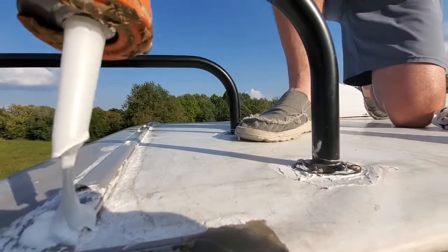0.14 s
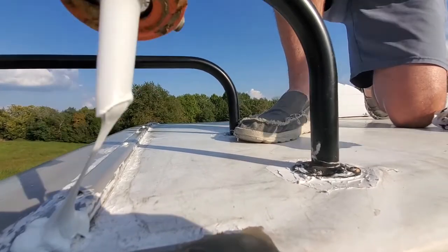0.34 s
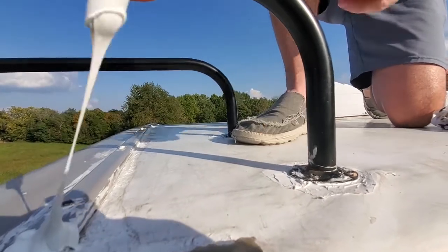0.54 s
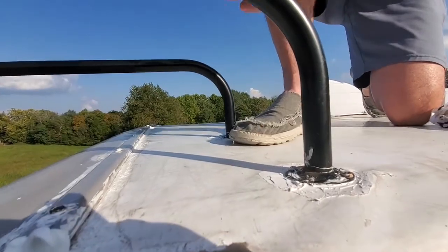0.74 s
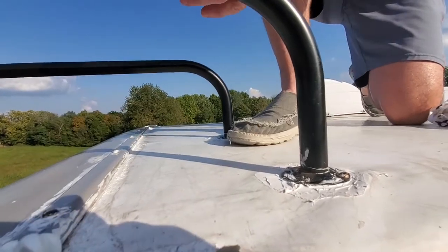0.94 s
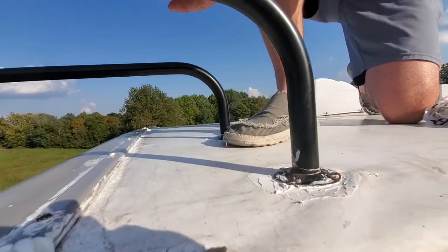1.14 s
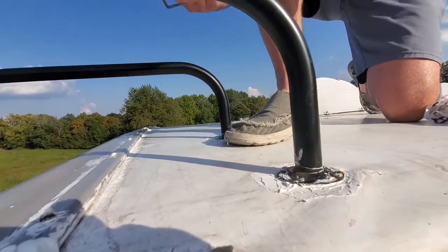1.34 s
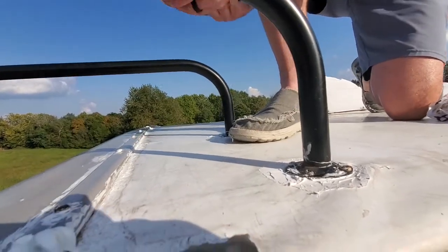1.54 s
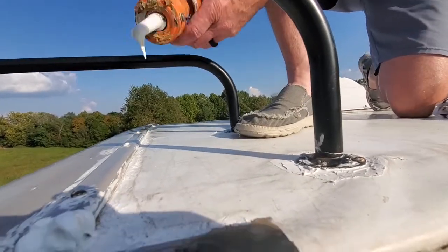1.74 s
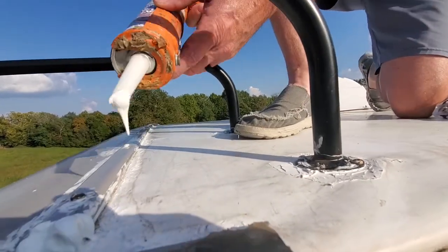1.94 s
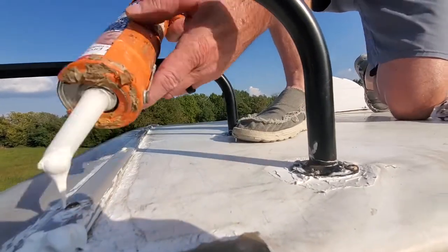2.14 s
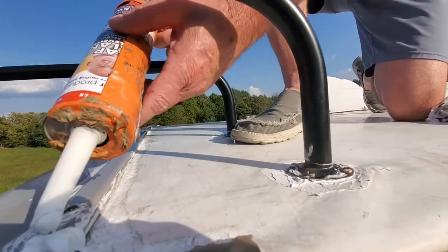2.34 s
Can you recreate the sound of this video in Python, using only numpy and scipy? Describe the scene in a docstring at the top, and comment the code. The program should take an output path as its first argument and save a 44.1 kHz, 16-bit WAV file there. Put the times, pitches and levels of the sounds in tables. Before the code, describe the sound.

A caulking gun handled close up on a vehicle roof outdoors: two bright steel snaps at 0.21 and 0.32 seconds, the first louder with a short panel boom. Grainy rustles follow, strongest around 1.0, with small ticks and dull hollow knocks at 1.23, 1.37 and, softer, 1.94. A faint rough squeak falls near 2.2. Throughout, quiet wavering engine hum, light breeze, and thin high insect trill.

```python
"""Outdoors, a distant engine hums while an insect trills over a high chorus in the grass: wavering sines and noise.
Close to the microphone, a caulking gun is lifted from a seam on a vehicle's roof. Its steel catch snaps twice,
as noise bursts that ring the modes of the frame, and the roof panel booms softly in modes of its own.
The gun is shifted in the hand with rustles of grainy noise, small ticks and three dull knocks of its tube,
then lowered again with a faint, rough squeak."""
import sys
import numpy as np
from scipy import signal
from scipy.fft import rfft, irfft, next_fast_len
from scipy.io import wavfile
from scipy.ndimage import map_coordinates

SR = 44100
rng = np.random.default_rng(int(sys.argv[2]) if len(sys.argv) > 2 else 0)


def materialize(psi):
    """Save the field psi as 16-bit PCM at rate SR to the path in sys.argv[1].

    A 1-D psi becomes a single channel; in a 2-D psi each row is a channel.
    """
    bounded = np.clip(np.atleast_2d(psi).T, -1, 1)
    quanta = np.round(bounded * 32767).astype(np.int16)
    wavfile.write(sys.argv[1], SR, quanta)


N = 105840
T = np.arange(N) / SR

# modes of the gun's frame: (frequency [Hz], relative level [dB], 60 dB decay time [s])
FRAME_MODES = [(760, -8.5, 0.095), (951, -17, 0.1), (1126, -3, 0.046), (1411, -8, 0.067),
               (1682, -10, 0.057), (2040, -3, 0.056), (2300, -3, 0.017), (2414, -3.5, 0.035),
               (2900, -14, 0.076), (3160, -6, 0.036), (4157, -1, 0.055), (5960, -27, 0.019),
               (8840, -15.5, 0.11), (10800, -20, 0.06)]
# modes of the roof panel: (frequency [Hz], relative level [dB], 60 dB decay time [s])
ROOF_MODES = [(157.3, -1, 0.13), (236.5, 4, 0.12), (274.4, -6, 0.14), (474, -14.5, 0.22)]
# likeness of the left and right channels: (frequency [Hz], correlation [-1 to 1])
LIKENESS = [(40, 1), (80, 0.97), (140, 1), (270, 0.97), (640, 0.24), (1500, 0), (15000, 0.02)]
BOOM_ATTACK_S = 0.00067


def amp(db):
    """Decibels to gain."""
    return 10 ** (np.asarray(db) / 20)


def unit(x):
    """Scale to rms 1."""
    return x / np.sqrt(np.mean(x ** 2) + 1e-20)


def along(points, hz):
    """Read a curve of (Hz, value) points on a log frequency axis."""
    point_hz, value = np.transpose(points)
    return np.interp(np.log(hz + 1), np.log(point_hz + 1), value)


def pan(db):
    """Left and right gains for a level difference; positive leans left."""
    return amp(np.array([[.5], [-.5]]) * db)


def wobble(rate):
    """A smooth random curve through normal draws, rate of them a second."""
    knots = rng.standard_normal(int(N * rate / SR) + 4)
    return map_coordinates(knots, [T * rate])


def filtered(x, response):
    """Apply a gain that depends on frequency."""
    size = next_fast_len(N + SR // 4)
    spectrum = rfft(x, size) * response(np.fft.rfftfreq(size, 1 / SR))
    return irfft(spectrum, size)[..., :N]


def dull(hz, corner_hz):
    """Gain of a soft contact: flat, then falling 18 dB an octave above the corner."""
    return 1 / np.sqrt(1 + (hz / corner_hz) ** 6)


def thin(hz, corner_hz):
    """Gain of a light contact: weak below the corner."""
    return hz ** 2 / np.hypot(hz ** 2, corner_hz ** 2)


def ear_angle(hz):
    """Angle whose cosine is the left-right likeness."""
    return np.arccos(np.clip(along(LIKENESS, hz), -1, 1))


def noise(gain):
    """Stereo noise of rms 1, alike in the bass and unrelated in the treble."""
    def mid_side_gain(hz):
        turn = ear_angle(hz) / 2
        return gain(hz) * np.array([np.cos(turn), np.sin(turn)])

    mid, side = filtered(rng.standard_normal((2, N)), mid_side_gain)
    return unit(np.array([mid + side, mid - side]))


def tone(hz):
    """A sine of rms 1 on a pitch curve."""
    return np.sqrt(2) * np.sin(2 * np.pi * np.cumsum(hz) / SR)


def fade(start, t60, hold=0):
    """Begin at full level, hold, then die away by 60 dB in t60 seconds."""
    return (T >= start) * np.exp(-np.log(1000) * np.maximum(T - start - hold, 0) / t60)


def stroke(start, length):
    """Rise, hold and release of a hand movement; start is halfway up the rise."""
    rise_s, release_s = 0.036, 0.047  # full rise; time constant of the release
    rise = np.clip((T - start) / rise_s + .5, 0, 1)
    return rise * np.exp(-np.maximum(T - start - length, 0) / release_s)


def ring(modes, start, attack, contact=np.ones_like):
    """Decaying sines of struck modes; the higher ones reach the two ears out of step."""
    since = np.maximum(T - start, 0)
    out = np.zeros((2, N))
    for hz, db, t60 in modes:
        ear_shift = ear_angle(hz) * rng.choice([-1, 1]) * np.array([[.5], [-.5]])
        phase = rng.uniform(0, 2 * np.pi) + ear_shift
        gain = amp(db + rng.standard_normal((2, 1))) * contact(hz)  # about 1 dB of scatter at each ear
        out += gain * fade(start, t60) * np.sin(2 * np.pi * hz * since + phase)
    return out * (1 - np.exp(-since / attack))


def distance():
    """A far engine as two wavering sines, over low outdoor rumble and open air."""
    # rise and fall of the hum, relative to hum_db: (time [s], relative level [dB])
    hum_course = [(0, -54), (.45, -58.5), (.8, -55.5), (.98, -56.5), (1.15, -68), (1.55, -67), (1.85, -61),
                  (2.05, -55.5), (2.4, -64)]
    # distant rumble and open air: (frequency [Hz], relative level [dB per Hz])
    air_colour = [(20, -26), (33, -6.5), (48, 3), (90, 4.5), (160, -8), (260, -4), (350, -15), (480, -22.5),
                  (800, -24), (1400, -32.5), (5000, -36), (16000, -38)]
    hum_hz, hum_drift_hz, hum_db = 123.7, 0.9, -0.5
    upper_hz, upper_drift_hz, upper_db = 191.4, 6.7, -64.5
    air_db = -59.5
    hum_gain = amp(hum_db + np.interp(T, *np.transpose(hum_course)))
    hum = hum_gain * tone(hum_hz + hum_drift_hz * wobble(6.16))
    upper = amp(upper_db) * tone(upper_hz + upper_drift_hz * wobble(18))
    return hum + upper + amp(air_db) * noise(lambda hz: amp(along(air_colour, hz)))


def breeze():
    """Light air flutters separately on each microphone port, the gusts shared by both."""
    # flutter: (frequency [Hz], relative level [dB per Hz])
    flutter_colour = [(25, -18.5), (50, -3), (75, 0.5), (110, -5), (260, -8.5), (400, -24), (1000, -54)]
    breeze_db, gust_db = -66, 5.5
    flutter = unit(filtered(rng.standard_normal((2, N)), lambda hz: amp(along(flutter_colour, hz))))
    return amp(breeze_db + gust_db * wobble(5.07)) * flutter


def insects():
    """One trill, each wing stroke swelling and arching in pitch, over the hiss of many."""
    # chorus in the grass: (frequency [Hz], relative level [dB per Hz])
    chorus_colour = [(3000, -48.5), (6000, -12), (6700, -6), (7300, 7), (7900, 3.5), (8300, -1), (9100, -1),
                     (9900, -6), (11500, -7), (13000, -0.5), (15500, 0)]
    # lean of the chorus: (frequency [Hz], left-right difference [dB])
    chorus_lean = [(7000, 1), (9000, 4.8), (15000, 10)]
    strokes_per_s, swell_db, trill_db, chorus_db = 32, 9.5, -67.5, -57
    trill_hz, arch_hz, blur_hz = 7540, 306, 132
    wing = np.cos(2 * np.pi * np.cumsum(strokes_per_s + 0.37 * wobble(3)) / SR)
    pitch = trill_hz + arch_hz * wing + blur_hz * wobble(1500)
    trill = unit(amp(swell_db * wing) * tone(pitch))
    chorus = noise(lambda hz: amp(along(chorus_colour, hz)))
    chorus = filtered(chorus, lambda hz: pan(along(chorus_lean, hz)))
    return amp(trill_db) * trill + amp(chorus_db) * chorus


def rubbed(hz):
    """Gain of friction, coloured by the modes of the frame."""
    # rubbing: (frequency [Hz], relative level [dB per Hz])
    rub_colour = [(100, -25), (400, 4), (850, 2.5), (1400, -8.5), (2100, -3), (2900, -5), (3400, -5),
                  (4100, 0.5), (5000, -4), (6200, 1.5), (10000, -2.5), (16000, 10.5)]
    peak_db, half_width_hz = 7, 30
    peaks = [1 / (1 + ((hz - mode[0]) / half_width_hz) ** 2) for mode in FRAME_MODES]
    return amp(along(rub_colour, hz) + peak_db * np.max(peaks, axis=0))


def patchy(x):
    """The colour of the friction shifts as the contact moves, by random gains over time and pitch."""
    patch_db, patch_hz, patch_s = 4.5, 355.4, .04
    bins = signal.stft(x, nperseg=512)[2]
    hz = np.linspace(0, SR / 2, bins.shape[1])
    seconds = np.linspace(0, N / SR, bins.shape[2])
    knots = rng.standard_normal((256, 256))
    places = np.meshgrid(hz / patch_hz, seconds / patch_s, indexing="ij")
    gain = unit(amp(patch_db * map_coordinates(knots, places, mode="wrap")))
    return signal.istft(bins * gain, nperseg=512)[1][:, :N]


def strokes_level(rows):
    """Summed level curve of hand movements given as (start, length, level)."""
    return sum(amp(db) * stroke(start, length) for start, length, db in rows)


def handling():
    """Grainy rubbing of hand and cloth, the tube's hollow note and the roof grumbling under shifting weight."""
    # rubbing strokes: (start [s], length [s], level [dB], low corner [Hz], high corner [Hz],
    # left-right difference [dB])
    rubs = [(.01, 0.02, -61, 2150, 2690, 5), (0.234, 0.031, -56, 400, 5700, 0),
            (0.347, 0.065, -53, 600, 12100, -1.5), (0.403, 0.38, -68.5, 300, 4860, 3.5),
            (0.892, 0.051, -55.5, 298, 5600, 1.5), (0.98, 0.089, -51.5, 302, 7600, 3.5),
            (1.115, 0.18, -59.5, 300, 8600, 0), (1.225, .14, -57, 305, 7600, 3),
            (1.663, 0.062, -73.5, 2420, 6100, 2), (2.092, 0.061, -67, 1300, 2450, -4),
            (2.172, 0.14, -71.5, 1500, 6150, 1.5)]
    # the hollow tube sounds as the hand slides on it: (start [s], length [s], level [dB])
    slides = [(.33, 0.14, -70), (.53, 0.034, -66.5), (.72, 0.058, -66.5), (.9, .19, -73.5)]
    # weight shifting on the roof: (start [s], length [s], level [dB])
    shifts = [(.25, 0.13, -53.5), (.72, 0.061, -57), (.91, 0.023, -54), (1.02, 0.034, -49),
              (1.33, 0.048, -49)]
    # roof grumble: (frequency [Hz], relative level [dB per Hz])
    grumble_colour = [(40, -18), (100, 3), (170, -2), (270, -6.5), (380, -17), (800, -41)]
    grain_db, grains_per_s = 1, 220
    hollow_hz, hollow_width_hz = 767, 180
    rub = np.zeros((2, N))
    for start, length, db, low_hz, corner_hz, pan_db in rubs:
        friction = noise(lambda hz: rubbed(hz) * thin(hz, low_hz) * dull(hz, corner_hz))
        rub += amp(db) * pan(pan_db) * stroke(start, length) * friction
    grain = unit(amp(grain_db * wobble(grains_per_s)))
    hollow = noise(lambda hz: 1 / (1 + ((hz - hollow_hz) / hollow_width_hz) ** 2))
    grumble = noise(lambda hz: amp(along(grumble_colour, hz)))
    return grain * patchy(rub) + strokes_level(slides) * hollow + strokes_level(shifts) * grumble


def catch():
    """Each snap is a steel crack with a dull tail; it rings the frame and sets the roof booming."""
    # snaps, crack and ring before panning: (time [s], ring level [dB], crack level [dB],
    # roof boom level [dB], low corner of the crack [Hz])
    snaps = [(0.2104, -29, -25.5, -33, 356), (0.3166, -34, -28.5, -50.5, 664)]
    # crack: (frequency [Hz], relative level [dB per Hz])
    crack_colour = [(100, 4), (500, 0.5), (1300, 5), (1850, -6), (2200, -1.5), (3100, 1.5), (3600, -13.5),
                    (4400, -1), (5200, -11), (6100, -2.5), (9500, -5.5), (12000, -16), (16000, -10)]
    crack_hold_s, crack_t60_s, ring_attack_s = 0.0026, 0.019, 0.00073
    tail_db, tail_t60_s, tail_corner_hz = -25.5, 0.23, 1940  # level relative to the crack
    pan_db = 4.5
    out = np.zeros((2, N))
    for start, ring_db, crack_db, boom_db, low_hz in snaps:
        colour = lambda hz: amp(along(crack_colour, hz)) * thin(hz, low_hz)
        crack = fade(start, crack_t60_s, crack_hold_s) * noise(colour)
        dull_noise = noise(lambda hz: colour(hz) * dull(hz, tail_corner_hz))
        tail = amp(tail_db) * fade(start, tail_t60_s) * dull_noise
        frame = amp(ring_db) * ring(FRAME_MODES, start, ring_attack_s)
        out += pan(pan_db) * (amp(crack_db) * (crack + tail) + frame)
        out += amp(boom_db) * ring(ROOF_MODES, start, BOOM_ATTACK_S)
    return out


def panel():
    """Single notes of the sheet roof, set ringing by the first snap and the third knock."""
    # notes: (time [s], frequency [Hz], level [dB], 60 dB decay time [s])
    notes = [(.215, 860, -49, 0.17), (.212, 2800, -52, 0.17), (.214, 603, -54, 0.22),
             (1.958, 312, -50, 0.34)]
    return sum(ring([(hz, db, t60)], start, attack=0.0021) for start, hz, db, t60 in notes)


def ticks():
    """Brief slips of the grip on the frame: short fading bursts of friction noise."""
    # slips: (time [s], level [dB])
    slips = [(.917, -52), (.954, -52), (1.031, -48.5), (1.07, -50), (1.23, -37.5), (1.369, -47)]
    t60_s, corner_hz = 0.043, 5400
    level = sum(amp(db) * fade(start, t60_s) for start, db in slips)
    return level * noise(lambda hz: rubbed(hz) * dull(hz, corner_hz))


def knocks():
    """Soft bumps of the tube: a scuff, a short hollow ring and the roof below."""
    # bumps: (time [s], level before panning [dB], low corner [Hz], high corner [Hz],
    # roof boom level [dB], left-right difference [dB])
    bumps = [(1.2308, -38.5, 166, 6500, -40, 2.5), (1.3705, -39, 344, 1430, -60, -0.5),
             (1.944, -44, 330, 860, -66, 2)]
    # modes of the tube in the hand: (frequency [Hz], relative level [dB], 60 dB decay time [s])
    tube_modes = [(190.4, -2.5, 0.22), (272.4, 2, 0.14), (302, -8, 0.23), (365, -6, 0.091),
                  (499.6, -3.5, 0.071), (795, -14.5, 0.15), (889, -6, 0.064), (1140, -2.5, 0.039),
                  (1830, -13, 0.081), (4540, -11, 0.047)]
    attack_s, scuff_db, scuff_t60_s = 0.00033, -12.5, 0.11  # scuff relative to the bump
    out = np.zeros((2, N))
    for start, db, low_hz, corner_hz, boom_db, pan_db in bumps:
        contact = lambda hz: thin(hz, low_hz) * dull(hz, corner_hz)
        scuff = amp(scuff_db) * fade(start, scuff_t60_s) * noise(contact)
        tube = ring(tube_modes, start, attack_s, contact)
        out += amp(db) * pan(pan_db) * (scuff + tube)
        out += amp(boom_db) * ring(ROOF_MODES, start, BOOM_ATTACK_S)
    return out


def squeak():
    """A faint falling note as the gun comes down, roughened in pitch and level."""
    start_s, length_s, level_db, rough_db = 2.2, 0.064, -69, 3.9
    start_hz, fall_hz_per_s, blur_hz = 843, 900, 35.5
    pitch = start_hz - fall_hz_per_s * (T - start_s) + blur_hz * wobble(200)
    return amp(level_db + rough_db * wobble(90)) * stroke(start_s, length_s) * tone(pitch)


def scene():
    """The gun close to the microphone, the field around it."""
    field = distance() + breeze() + insects()
    gun = handling() + catch() + panel() + ticks() + knocks() + squeak()
    return field + gun


def record(dry):
    """Keep only what lies below the upper band limit of 15.9 kHz."""
    return filtered(dry, lambda hz: hz < 15900)


dry = scene()
out = record(dry)
materialize(out)
```